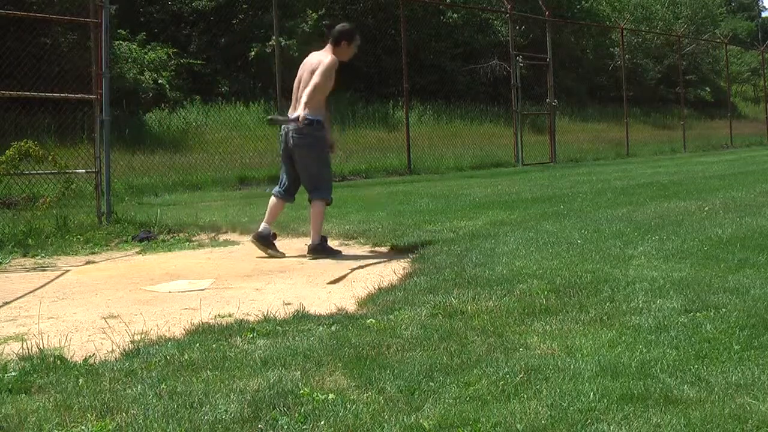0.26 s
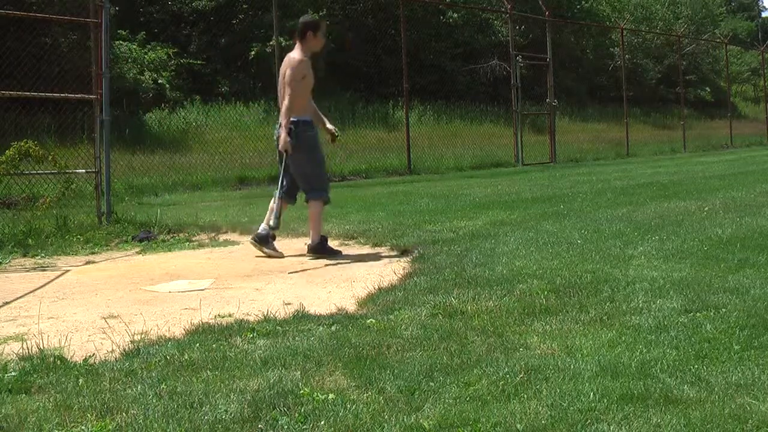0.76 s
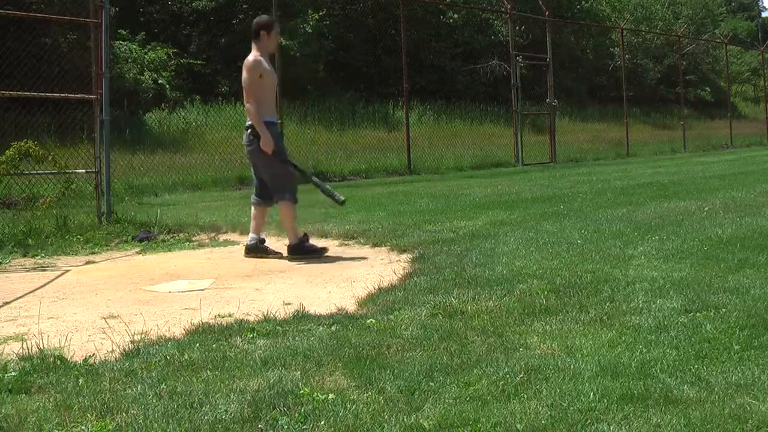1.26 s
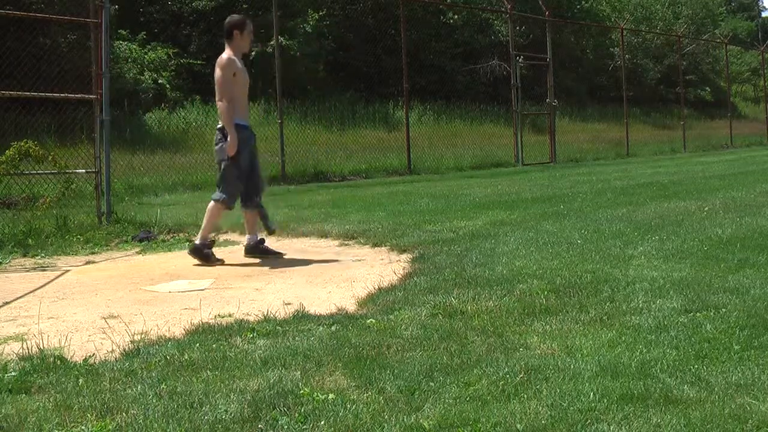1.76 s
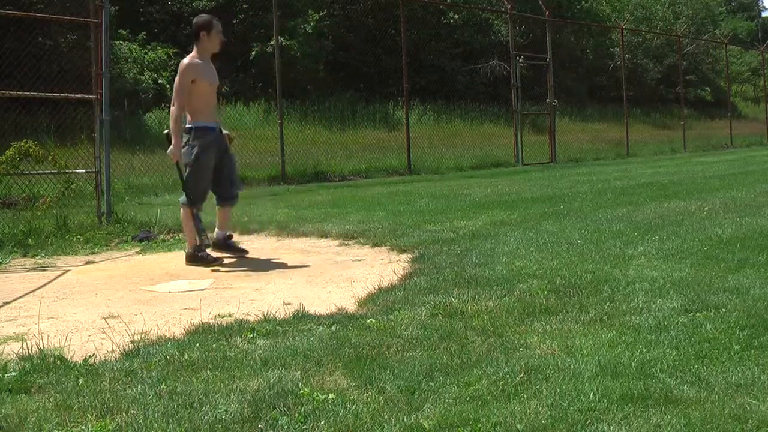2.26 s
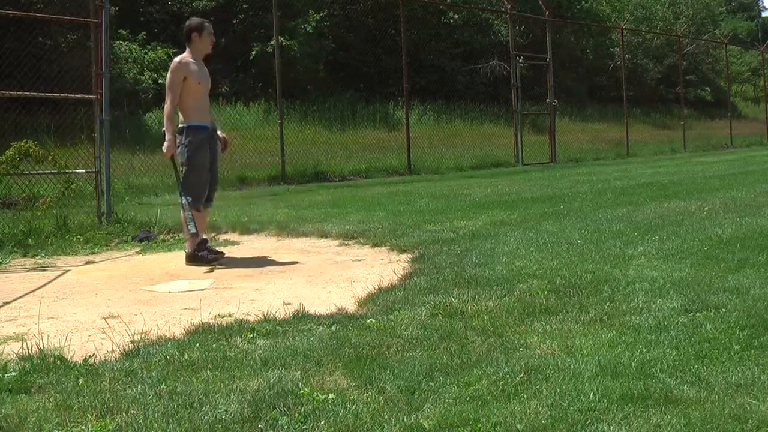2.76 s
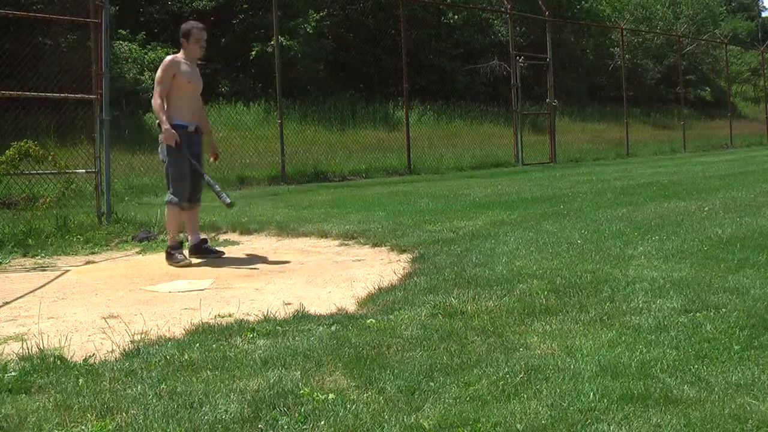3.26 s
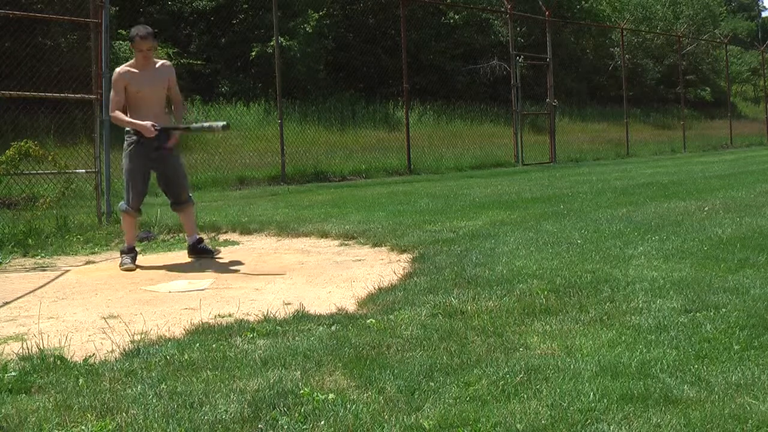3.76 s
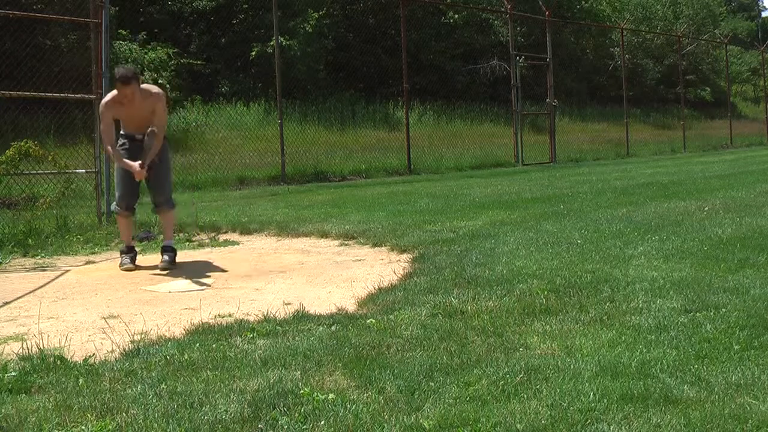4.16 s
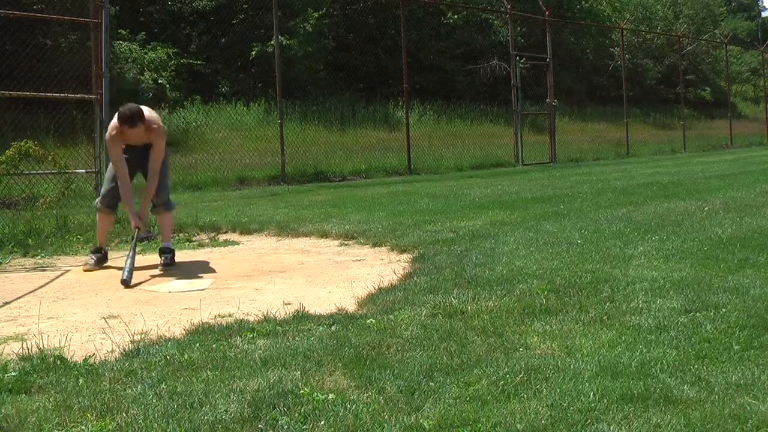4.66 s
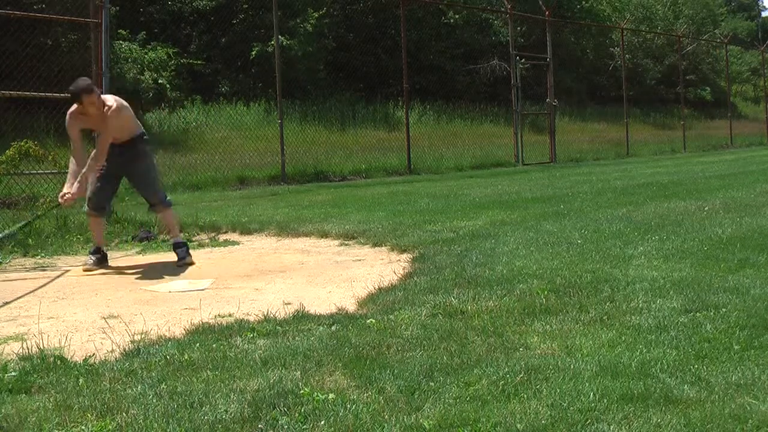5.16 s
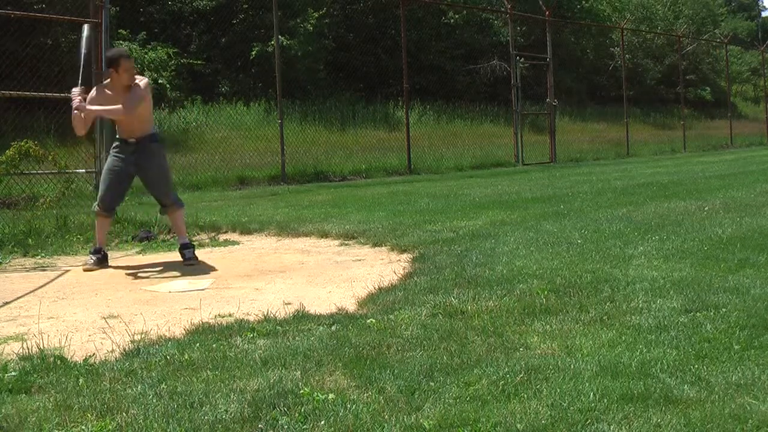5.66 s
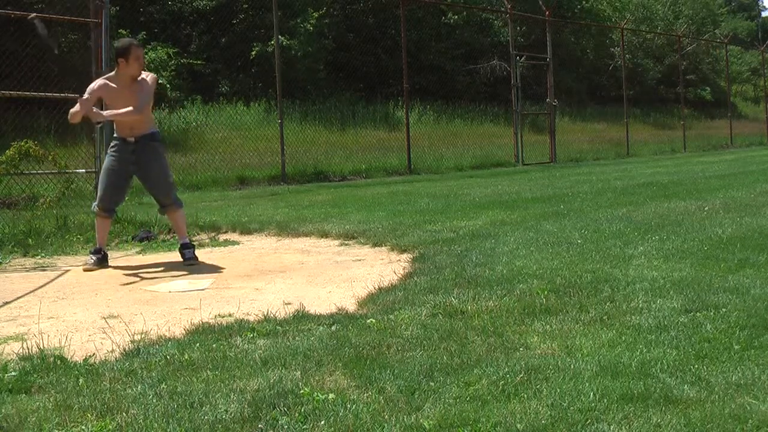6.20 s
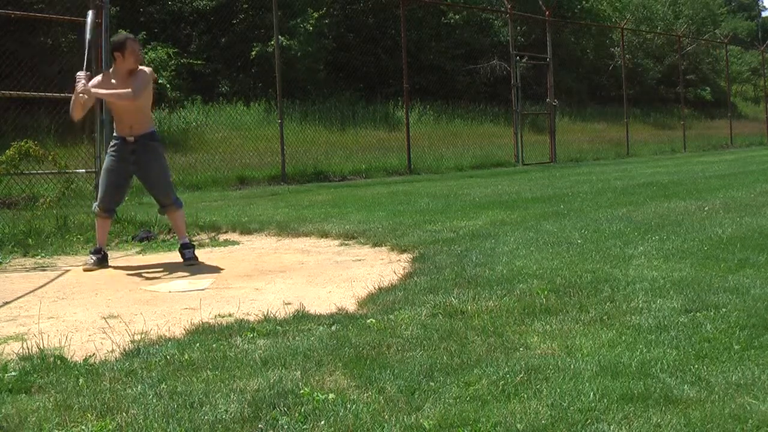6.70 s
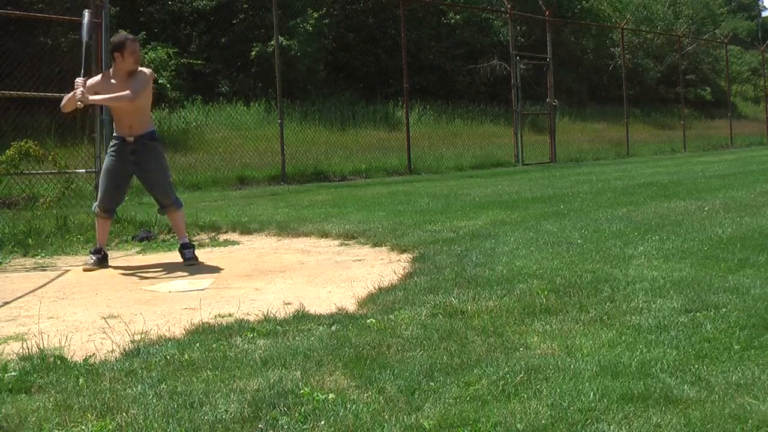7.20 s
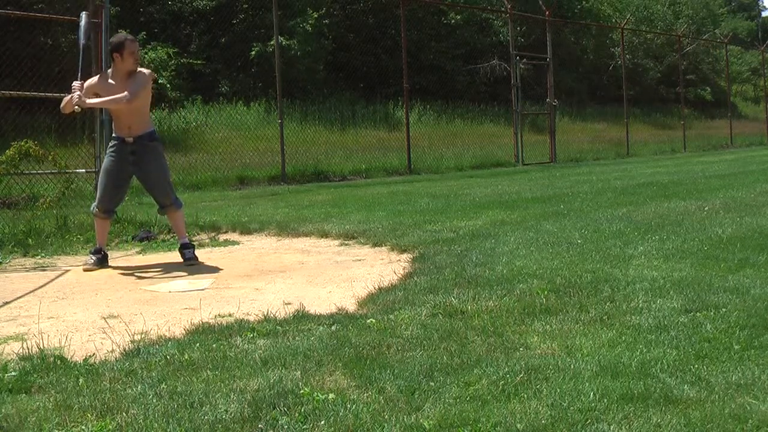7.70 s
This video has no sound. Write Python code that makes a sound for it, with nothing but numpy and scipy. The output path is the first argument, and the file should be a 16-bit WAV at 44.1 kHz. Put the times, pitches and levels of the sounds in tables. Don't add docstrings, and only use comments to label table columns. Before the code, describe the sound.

Quiet outdoor ball field with echoing birdsong, faint distant traffic, gritty shoe scrapes and one loud hollow knock of a metal bat on the plate.

```python
import sys
import numpy as np
from scipy import signal
from scipy.fft import rfft, irfft, next_fast_len
from scipy.io import wavfile
from scipy.ndimage import map_coordinates

SR = 44100
rng = np.random.default_rng(int(sys.argv[2]) if len(sys.argv) > 2 else 0)


def output_pcm(signal):
    pcm = np.clip(np.atleast_2d(signal).T, -1, 1) * 32767
    wavfile.write(sys.argv[1], SR, np.round(pcm).astype(np.int16))


def to_linear_factor(level_db):
    exponent = np.asarray(level_db, float) / 20
    return 10 ** exponent


N = 350154

FAR_SLIDES = [(.31, .065, 3350, 2730, -63), (.365, .055, 3370, 3380, -66), (.142, .025, 3600, 2580, -68),
              (.195, .04, 2800, 2580, -70), (.865, .055, 3200, 2480, -63), (1.25, .025, 3600, 3520, -65),
              (1.285, .045, 3440, 2880, -62), (1.325, .035, 2870, 2830, -57), (1.355, .03, 2750, 2100, -67),
              (1.385, .035, 2100, 3200, -68), (1.3, .06, 3500, 3100, -69), (1.545, .07, 2820, 2500, -61),
              (1.6, .16, 2570, 2740, -62), (1.61, .13, 3090, 2800, -63), (1.93, .07, 3050, 3340, -62),
              (1.99, .12, 3340, 3280, -62), (3.155, .03, 3250, 3220, -68), (5.855, .045, 2570, 2280, -65),
              (6.04, .05, 2600, 2200, -66), (7.11, .07, 2800, 2400, -67), (2.395, .03, 3100, 3000, -59),
              (2.7, .06, 3940, 3450, -72), (2.745, .09, 3540, 2880, -59), (2.82, .07, 2950, 2600, -62)]
FAR_DROPS = [
    (.27, .055, 3390, 3330, -58),
    (.755, .085, 3130, 2150, -61),
    (2.04, .045, 3280, 2780, -59),
]
FAR_BURRS = [(.39, .07, 2800, 3300, -66), (1.37, .09, 2950, 2800, -63), (1.67, .2, 2720, 2720, -63),
             (2.075, .06, 2800, 3600, -61), (2.42, .06, 2600, 3350, -64), (2.48, .06, 2900, 2650, -61),
             (2.5, .04, 2700, 2300, -66), (2.335, .05, 3250, 3100, -69), (3.18, .12, 2590, 2780, -65),
             (3.29, .19, 2770, 2400, -65), (3.22, .12, 3150, 2950, -68),
             (2.1, .1, 3500, 4150, -69), (.167, .03, 2600, 3300, -72), (2.865, .07, 2500, 2050, -65),
             (2.88, .08, 2700, 2500, -66), (2.13, .1, 3000, 2850, -67), (.33, .07, 3200, 2900, -65),
             (1.31, .08, 3300, 3200, -67), (.92, .07, 3100, 3100, -69)]
NEAR_SLIDES = [(4.578, .028, 3300, 3500, -63), (4.64, .08, 3150, 2400, -71), (4.725, .08, 3000, 2350, -70),
               (5.274, .034, 3240, 2980, -58), (5.36, .015, 3243, 2300, -58),
               (5.552, .028, 3793, 3480, -56), (5.575, .028, 3490, 3690, -55),
               (5.598, .04, 3700, 2900, -55), (5.63, .025, 2980, 2820, -60), (5.93, .05, 2900, 2820, -62),
               (5.46, .03, 3680, 3700, -66), (5.69, .02, 2900, 2880, -66), (6.18, .02, 3700, 3950, -67),
               (7.06, .06, 3350, 2820, -63), (5.345, .02, 3800, 3950, -67), (6.25, .03, 2900, 3000, -66),
               (6.685, .085, 3450, 2830, -57), (6.76, .06, 2860, 2680, -58), (6.81, .06, 2680, 2700, -66)]
NEAR_DROPS = [
    (5.838, 0.069, 3546, 2773, -54.5),
    (6.655, 0.03, 3470, 3350, -67),
]
NEAR_BURRS = [(5.38, .08, 3150, 3450, -69), (6.21, .045, 2850, 3450, -64), (5.9, .095, 2950, 2450, -65),
              (5.9, .04, 3300, 3100, -65), (6.388, .045, 2850, 3600, -54), (6.42, .04, 3530, 4100, -61),
              (6.44, .07, 3200, 3200, -62), (6.91, .12, 2931, 2420, -68), (6.81, .05, 2350, 2250, -68),
              (7.13, .05, 3200, 3500, -71)]
AHEAD_SLIDES = [(.95, .095, 2750, 2350, -64), (.333, .018, 2720, 2600, -65), (1.065, .045, 3280, 2980, -64),
                (2.22, .045, 3300, 2250, -63), (2.27, .065, 1900, 2150, -70), (2.36, .04, 2600, 2400, -66),
                (3.92, .07, 2800, 2750, -69), (7.603, .022, 3330, 2600, -65), (7.62, .135, 2540, 2500, -69),
                (7.635, .025, 2700, 3450, -66), (7.645, .025, 3350, 3400, -69)]
THIN_CALLS = [(5.285, .02, 4633, 4430, -75), (5.607, 0.02, 4470, 4700, -67),
              (5.625, 0.018, 4740, 3600, -69), (5.675, 0.013, 5400, 5000, -69),
              (5.77, 0.028, 4460, 4730, -70), (5.797, .012, 4700, 3500, -71),
              (6.121, 0.04, 5000, 3800, -73.5), (6.391, .04, 5230, 4284, -71),
              (6.501, .03, 5610, 6100, -68)]

# (time [s], length [s], pitch at ends [Hz], pitch at middle [Hz], level [dB rms])
NEAR_ARCHES = [
    (5.298, .046, 3250, 2830, -55),
    (6.27, .12, 2900, 3320, -56),
]
LONG_WHISTLE = [
    (4.845, .157, 2600, 3560, -56),
]
THIN_DIP = [
    (5.278, 0.048, 5950, 4440, -77),
]
# (time [s], length [s], low pitch [Hz], high pitch [Hz], level [dB rms])
TRILL = [
    (5.0, .04, 2480, 3200, -59),
]

# (time [s], level [dB])
BLOWS = [
    (4.546, -9.5),
    (4.5642, -23.5),
]
# (frequency [Hz], level [dB], t60 [s])
PLATE_MODES = [(85.7, -16, 0.39), (152, 0.5, 0.044), (316, 6.5, 0.021), (267, 11, 0.018), (371, -1, 0.03),
               (634, -2, 0.031), (798, -10, 0.041)]
# (frequency [Hz], level [dB], t60 [s])
BARREL_MODES = [(1265, -22, 0.047), (1553, -26, .045), (2380, -25.5, 0.034), (2880, -26.5, 0.049),
                (3730, -29, 0.058), (4850, -35, 0.051)]
# (frequency [Hz], width [Hz], level [dB])
BARREL_BANDS = [(1130, 470, 7.5), (2610, 1450, 2), (3600, 440, 3.5), (6100, 1500, -10.5),
                (10900, 8200, -15)]

# (time [s], length [s], hiss level [dB], body over hiss [dB], rasp over hiss [dB])
SCUFFS = [(1.036, 0.23, -69, 6, -16), (3.21, 0.49, -62, -1, -5), (3.51, 0.36, -64, 1, -4),
          (3.794, 0.13, -67.5, 2, -9), (5.061, 0.076, -75, 11.5, 1), (5.32, 0.2, -71, 3, 5),
          (5.392, 0.45, -77.5, 11.5, -3), (7.346, 0.094, -66, -25, 4.5), (7.409, 0.087, -62.5, -17, 6)]
# (frequency [Hz], density [dB per Hz])
SAND_SPECTRUM = [(3240, -38), (5500, 4), (6660, 0), (7230, -7), (7990, 2), (9130, 4), (12300, -8),
                 (14000, -8), (15500, -5)]
# (frequency [Hz], width [Hz], level [dB])
SOLE_BANDS = [(970, 550, 10.5), (1730, 550, 13), (2880, 1100, 9.5)]
# (frequency [Hz], width [Hz], level [dB])
RASP_BANDS = [(3860, 560, -2), (5000, 810, -1)]
# (time [s], length [s], start pitch [Hz], end pitch [Hz], level [dB rms], width [Hz])
SQUEAKS = [(3.3, .2, 1620, 1600, -66, 350), (3.29, .33, 3260, 3080, -62, 260),
           (3.42, .32, 2480, 2220, -62, 340), (3.56, .36, 1800, 1720, -60, 420),
           (3.66, .22, 3330, 3480, -66, 220), (3.7, .25, 4050, 3950, -69, 220),
           (3.3, .2, 2850, 2550, -63, 550), (7.355, .125, 5050, 5150, -67, 600),
           (3.36, .42, 7900, 7850, -69, 600), (3.4, .4, 6700, 6650, -75, 450),
           (3.45, .3, 4700, 4680, -72, 400), (5.37, .2, 4600, 4550, -72, 500),
           (7.44, .045, 1800, 1780, -66, 400), (3.6, .16, 2150, 2000, -66, 500)]
# (time [s], peak level [dB], sparkle over peak [dB], t60 [s])
CRACKS = [(0.4543, -47, -12, 0.022), (0.6141, -37, -18, 0.011), (0.627, -38.5, -12, 0.013),
          (0.644, -50, -5, .015), (1.785, -55, -10, 0.13), (1.8, -49, -14, 0.087), (1.887, -51, -10, 0.022),
          (3.297, -54, -10, .02), (3.3994, -51, -8, .02), (3.426, -44, -8, .02), (1.897, -48, -10, .015),
          (3.679, -45, -11, .08), (4.332, -48.5, -14, .02), (4.74, -49, -4, 0.052),
          (4.8413, -53, 0.5, 0.17), (4.866, -45, -4, 0.023), (7.55, -27.5, -1, 0.015)]
# (time [s], peak level [dB], thud over peak [dB], t60 [s], thud pitch [Hz])
KNOCKS = [(.505, -64.5, 24, 0.11, 296), (1.159, -56, 7, 0.03, 1390), (2.1458, -53, 19, 0.018, 1260),
          (2.512, -49.5, 6.5, 0.22, 520), (2.534, -47, 1, 0.038, 810), (2.566, -54, 9, 0.032, 900),
          (3.453, -49, 9, 0.031, 900), (3.846, -54.5, 14, 0.043, 1740), (3.852, -54, 12, 0.077, 1660),
          (4.2604, -44.5, 0.5, 0.17, 1440), (4.275, -48, 6, 0.069, 686), (4.7205, -37, 3.5, 0.036, 438),
          (4.772, -52, -1, 0.022, 698), (7.852, -54, 1.5, 0.065, 1070), (7.869, -59.5, 12.5, .03, 1500)]
# (frequency [Hz], level [dB], t60 [s])
PEBBLE_MODES = [(1770, -14, 0.029), (3080, -12, 0.0074), (4100, 4.5, 0.0095), (5000, -4, 0.0087),
                (5430, -14, 0.03), (6230, 6, 0.0097), (7600, -6, .008), (9230, 2, 0.014), (11000, -7, .008)]

# (time [s], level [dB])
TRAFFIC = [(0, -45), (2.05, -45), (2.43, -44.5), (3.63, -45.5), (4.4, -43.5), (5.5, -45.5), (6.72, -43),
           (7.6, -47)]
# (time [s], pitch [Hz], level [dB rms])
DRONE = [(0, 155.9, -59), (1.2, 155.4, -55.5), (1.7, 154, -59), (2.15, 154, -47), (2.85, 157, -50),
         (3.14, 149.3, -48.5), (3.32, 133.2, -43.5), (4.53, 135.8, -40), (4.62, 130.4, -49),
         (4.88, 140.6, -40.5), (5.59, 144, -52), (6.08, 142.2, -50), (6.35, 146.1, -50), (7.94, 152, -45)]
# (time [s], level [dB rms])
THROB = [(3.3, -50), (3.6, -45), (3.76, -42), (3.95, -55), (4.7, -106), (4.85, -35.5), (5.1, -44.5),
         (5.5, -44.5), (5.8, -57)]
# (frequency [Hz], density [dB per Hz])
TRAFFIC_SPECTRUM = [(18, -35), (30, -5.5), (76, -1.5), (153, -1.5), (243, -5), (319, -16), (379, -19),
                    (543, -22.5), (847, -23.5), (1800, -33.5), (2340, -43.5), (3960, -120)]
# (frequency [Hz], density [dB per Hz])
HISS_SPECTRUM = [(940, -35), (1600, -18), (1700, -8), (1850, -4), (2490, -0.5), (2820, 1.5), (3260, 0),
                 (4000, -4), (4990, -7), (8150, -13), (14400, -8.5), (16000, -13)]
# (frequency [Hz], density [dB per Hz])
SIDE_SPECTRUM = [(35, -46), (60, -60), (172, -5), (458, 2.5), (651, 1.5), (1040, 1), (3270, -9.5),
                 (4220, -14), (8510, -22.5), (9570, -36.5), (16000, -30.5)]


def unit(x):
    return x / np.sqrt(np.mean(x ** 2) + 1e-20)


def along(points, hz):
    f, v = np.transpose(points)
    return np.interp(np.log(hz + 1), np.log(f + 1), v)


def curves(rows):
    s, *cols = np.transpose(rows)
    return [np.interp(np.arange(N) / SR, s, c) for c in cols]


def wobble(rate_hz):
    knots = rng.standard_normal(int(N * rate_hz / SR) + 4)
    return map_coordinates(knots, [np.arange(N) * rate_hz / SR])


def filtered(x, response):
    m = next_fast_len(x.shape[-1] + 8192)
    spectrum = rfft(x, m) * response(np.fft.rfftfreq(m, 1 / SR))
    return irfft(spectrum, m)[..., :x.shape[-1]]


def shaped_noise(spectrum):
    return unit(filtered(rng.standard_normal(N), lambda hz: to_linear_factor(along(spectrum, hz))))


def resonances(bands):
    def response(f):
        total = 0
        for k, (c, w, db) in enumerate(bands):
            total = total + (-1) ** k * to_linear_factor(db) * 1j * f * w / (c * c - f * f + 1j * f * w)
        return total
    return response


def ringing(modes, t):
    return sum(to_linear_factor(db - 60 * t / t60) * np.sin(2 * np.pi * hz * t) for hz, db, t60 in modes)


def gate(t0, t1, edge_s):
    t = np.arange(N) / SR
    return np.clip(np.minimum(t - t0, t1 - t) / edge_s, 0, 1)


def echoes(x, t60_s, delay_s):
    t, step = np.arange(SR // 2) / SR, SR // 4
    out = np.zeros((2, N + SR))
    for start in range(0, N, step):
        tail = rng.standard_normal((2, len(t))) * to_linear_factor(-60 * t / t60_s) * (t > delay_s)
        tail /= np.linalg.norm(tail[0])
        wet = signal.fftconvolve(x[None, start:start + step], tail, axes=1)
        out[:, start:start + wet.shape[1]] += wet
    return out[:, :N]


def slide(u):
    return u


def drop(u):
    return u ** 3.2


def arch(power):
    return lambda u: 1 - np.abs(2 * u - 1) ** power


def warble(u):
    return np.sin(np.pi * 2.2 * u) ** 2


def song(notes, path, flutter_db, burr_hz, swell_db):
    attack_s, release_s = 0.0068, 0.0032
    out = np.zeros(N)
    shake_hz = burr_hz * np.sin(1.533 * wobble(260))
    for s, length, a_hz, b_hz, db in notes:
        t = np.arange(int(length * SR)) / SR
        where = slice(round(s * SR), round(s * SR) + len(t))
        hz = a_hz + (b_hz - a_hz) * path(t / length) + shake_hz[where]
        edges = np.clip(np.minimum(t / attack_s, (length - t) / release_s), 0, 1)
        level_db = db + 6.0 - swell_db * (2 * t / length - 1) ** 2
        out[where] += edges * to_linear_factor(level_db) * np.sin(2 * np.pi * np.cumsum(hz) / SR)
    return out * to_linear_factor(flutter_db * wobble(70))


def far_bird():
    swell_db, burr_hz, hoarse_hz = 5, 85, 220
    far = song(FAR_SLIDES, slide, 0.89, burr_hz, swell_db)
    far += song(FAR_DROPS, drop, 0.89, burr_hz, swell_db)
    far += song(FAR_BURRS, slide, 0.89, hoarse_hz, swell_db)
    direct = far * [[to_linear_factor(4.5)], [-to_linear_factor(-43)]]
    return direct + to_linear_factor([[3], [-8]]) * echoes(far, t60_s=0.75, delay_s=0.0092)


def right_birds():
    swell_db, burr_hz, hoarse_hz = 3.5, 14, 220
    near = song(NEAR_SLIDES, slide, 1.0, burr_hz, swell_db)
    near += song(NEAR_DROPS, drop, 1.0, burr_hz, swell_db)
    near += song(NEAR_ARCHES, arch(2), 1.0, burr_hz, swell_db)
    near += song(NEAR_BURRS, slide, 2.3, hoarse_hz, swell_db)
    thin = to_linear_factor(-0.5) * song(THIN_CALLS, slide, 2.3, 110, swell_db)
    thin += song(THIN_DIP, arch(2), 2.7, 40, swell_db)
    right = (near + thin) * [[-to_linear_factor(-29)], [to_linear_factor(5)]]
    right = right + to_linear_factor([[-3], [-3.5]]) * echoes(near + 0.67 * thin, t60_s=0.9, delay_s=0.02)

    clear = song(LONG_WHISTLE, arch(4.6), 0.6, burr_hz, swell_db=-3.5)
    clear += song(TRILL, warble, 0.6, burr_hz, swell_db)
    whistle = clear * [[-to_linear_factor(-29)], [to_linear_factor(6.5)]]
    return right + whistle + to_linear_factor([[-11], [-12]]) * echoes(clear, t60_s=0.99, delay_s=0.016)


def ahead_bird():
    ahead = song(AHEAD_SLIDES, slide, 3, 90, swell_db=3.5)
    return ahead * to_linear_factor([[-4.1], [2.1]]) + to_linear_factor(-6.5) * echoes(ahead, t60_s=0.39, delay_s=0.0079)


def bat():
    rise_s = 0.0045
    out, t = np.zeros((2, N)), np.arange(SR // 4) / SR
    for s, db in BLOWS:
        ring = ringing(PLATE_MODES, t) * np.sin(np.pi / 2 * np.clip(t / rise_s, 0, 1)) ** 2
        tube = ringing(BARREL_MODES, t)
        burst = to_linear_factor(-13.5 - 60 * t / 0.054) * rng.standard_normal(len(t))
        crack = filtered(burst, resonances(BARREL_BANDS))
        click = to_linear_factor(-22 - 60 * t / 0.0095) * rng.standard_normal(len(t))
        blow = ring + (crack + tube + click) * to_linear_factor([[2.2], [-2.8]])
        out[:, round(s * SR):][:, :len(t)] += to_linear_factor(db) * blow
    return out


def ticks():
    out, t = np.zeros((2, N + SR)), np.arange(SR // 8) / SR
    crack_bands = resonances([(2750, 2000, -6.5), (4600, 1700, -5.0), (6100, 1030, -9.5)])
    sparkle_band = resonances([(9300, 4500, 0)])
    contacts = [(s, db, -7, sparkle_db, t60, 1010) for s, db, sparkle_db, t60 in CRACKS]
    contacts += [(s, db, thud_db, -6, t60, thud_hz) for s, db, thud_db, t60, thud_hz in KNOCKS]
    for s, db, thud_db, sparkle_db, t60, thud_hz in contacts:
        noise = rng.standard_normal((5, len(t)))
        crack = unit(filtered(noise[0] + 0.69 * noise[:2] * [[0], [1]], crack_bands))
        sparkle_noise = noise[2] + 0.55 * noise[2:4] * [[0], [1]]
        sparkle = unit(filtered(sparkle_noise, lambda hz: sparkle_band(hz) ** 2))
        thud_band = resonances([(thud_hz, 1.2 * thud_hz, 0)])
        thud = unit(filtered(noise[4], lambda hz: thud_band(hz) ** 2))
        shape = to_linear_factor(db - 4.5 - 60 * t / t60) * (1 - np.exp(-t / 0.000067))
        bright = (crack + to_linear_factor(sparkle_db) * sparkle) * to_linear_factor([[1.5], [-1.5]])
        out[:, round(s * SR):][:, :len(t)] += shape * (bright + to_linear_factor(thud_db) * thud)
    return out[:, :N]


def chatter():
    out = np.zeros(N)
    for s, length, a_hz, b_hz, db, width_hz in SQUEAKS:
        u = np.linspace(0, 1, int(length * SR))
        knots = rng.standard_normal((2, 300))
        a, b = [map_coordinates(k, [u * min(length * width_hz, 290)]) for k in knots]
        turn = 2 * np.pi * np.cumsum(a_hz + (b_hz - a_hz) * u) / SR
        edges = np.clip(4 * np.minimum(u, 1 - u), 0, 1)
        out[round(s * SR):][:len(u)] += to_linear_factor(db) * edges * (a * np.cos(turn) + b * np.sin(turn))
    return out


def scuffs():
    def sand(hz):
        bounce = 0.14 * np.exp(-2j * np.pi * hz * 0.00074)
        return to_linear_factor(along(SAND_SPECTRUM, hz)) * np.abs(1 + bounce)

    grit = rng.standard_normal((3, N)) * to_linear_factor(1.4 * wobble(400) + 0.7 * wobble(25))
    hiss = unit(filtered(grit[0], sand))
    body = unit(filtered(grit[1], resonances(SOLE_BANDS)))
    rasp = unit(filtered(grit[2], lambda hz: resonances(RASP_BANDS)(hz) ** 2))
    out = chatter()
    for s, length, hiss_db, body_db, rasp_db in SCUFFS:
        drag = hiss + to_linear_factor(body_db + 7.5) * body + to_linear_factor(rasp_db - 1.0) * rasp
        out += gate(s, s + length, 0.32 * length) ** 2 * to_linear_factor(hiss_db) * drag
    return out


def pebble():
    snap_s, snap_db = 7.5498, -32.5
    out, t = np.zeros(N), np.arange(SR // 10) / SR
    snap = to_linear_factor(snap_db) * ringing(PEBBLE_MODES, t) * (1 - np.exp(-t / 0.00031))
    out[round(snap_s * SR):][:len(t)] = snap
    return out * to_linear_factor([[1], [-1]])


def engines():
    hz, db = curves(DRONE)
    drone_hz = hz + 3 * wobble(15) + 4 * wobble(6)
    drone = to_linear_factor(db + 1.0 + 0.5 * wobble(11)) * np.sin(2 * np.pi * np.cumsum(drone_hz) / SR)
    throb_hz = 97 + 5 * wobble(10)
    throb_db = curves(THROB)[0] + 0.73 * wobble(12)
    return drone + to_linear_factor(throb_db) * np.sin(2 * np.pi * np.cumsum(throb_hz) / SR)


def air():
    rumble_db, = curves(TRAFFIC)
    wash_db = -58 + 0.28 * (rumble_db - rumble_db.mean())
    traffic = filtered(rng.standard_normal(N), lambda hz: to_linear_factor(along(TRAFFIC_SPECTRUM, hz)))
    rumble = unit(filtered(traffic, lambda hz: hz < 350)) * to_linear_factor(rumble_db + 0.5 + 1.45 * wobble(4.5))
    wash = unit(filtered(traffic, lambda hz: hz >= 350)) * to_linear_factor(wash_db + 0.77 * wobble(6.4))
    hiss = to_linear_factor(-64.0 + 0.33 * wobble(1.54)) * shaped_noise(HISS_SPECTRUM)
    side = to_linear_factor(-57 + 1.6 * wobble(1.428)) * shaped_noise(SIDE_SPECTRUM)
    return rumble + wash + hiss * to_linear_factor([[0.8], [-0.8]]) + side * [[1.15], [-0.85]]


def scene():
    birds = far_bird() + right_birds() + ahead_bird()
    batter = bat() + ticks() + scuffs() * to_linear_factor([[1.2], [-1.2]])
    upper = filtered(batter.mean(0), lambda hz: 1j * hz / (500 + 1j * hz))
    fence = to_linear_factor(-19.0) * echoes(upper, t60_s=0.077, delay_s=0.0049)
    return birds + batter + fence + pebble() + engines() + air()


def top_cut(x):
    return signal.sosfilt(signal.butter(12, 15800, fs=SR, output="sos"), x)


def record(dry):
    mix = filtered(dry, lambda hz: (1j * hz / (30 + 1j * hz)) ** 2)
    return top_cut(mix)


dry = scene()
out = record(dry)
output_pcm(out)
```